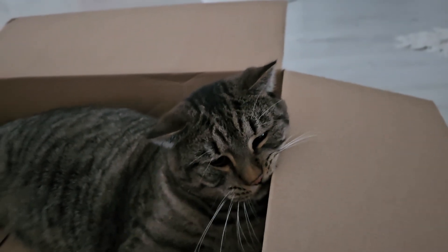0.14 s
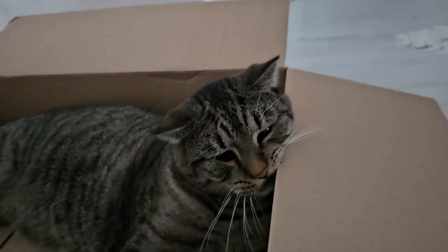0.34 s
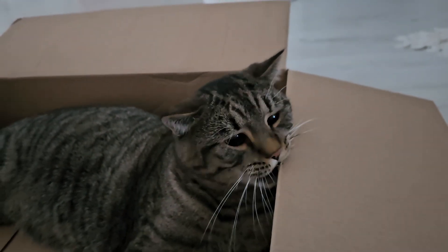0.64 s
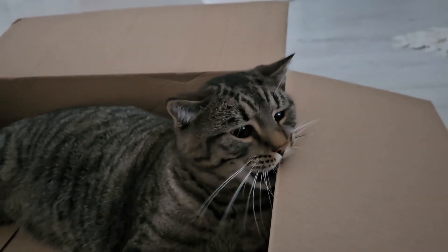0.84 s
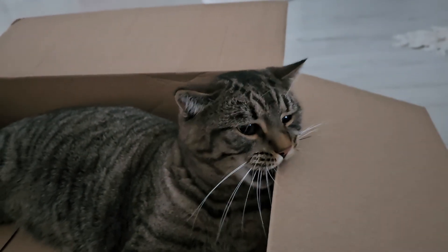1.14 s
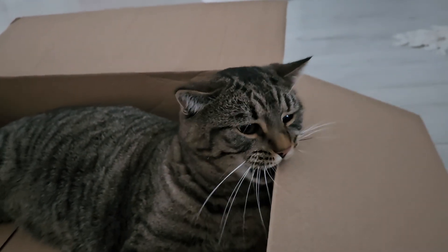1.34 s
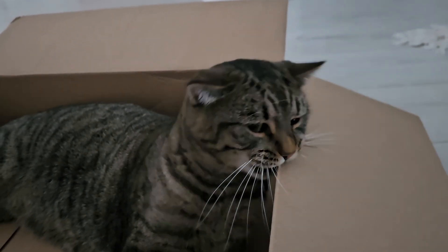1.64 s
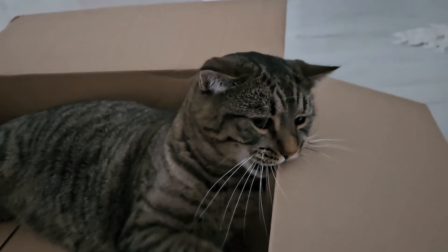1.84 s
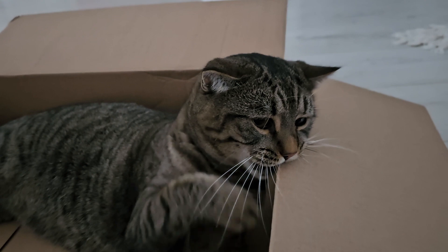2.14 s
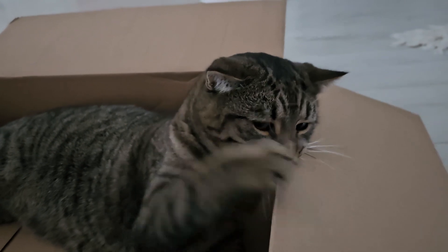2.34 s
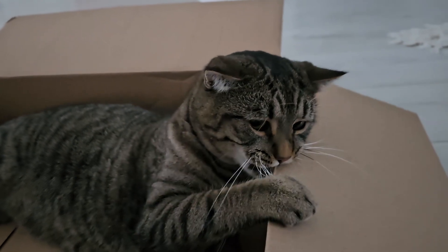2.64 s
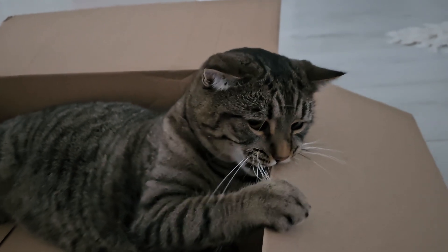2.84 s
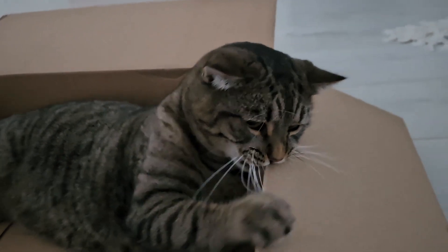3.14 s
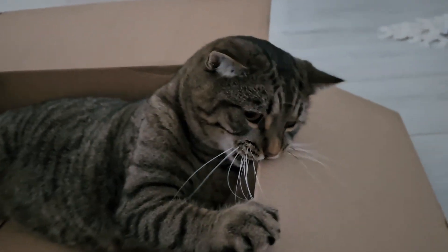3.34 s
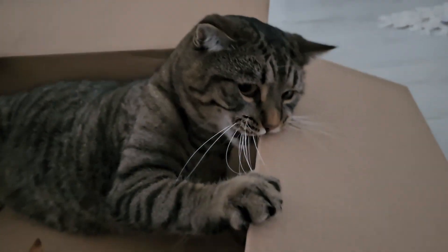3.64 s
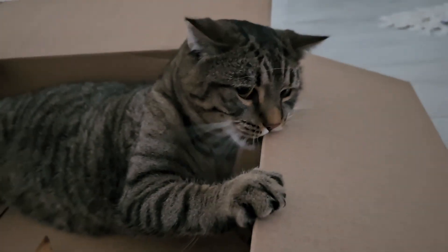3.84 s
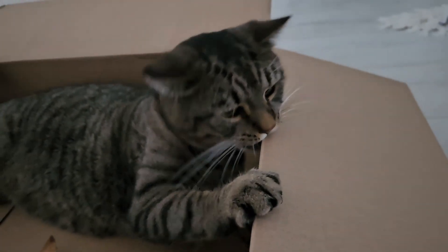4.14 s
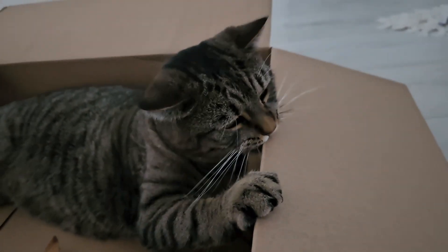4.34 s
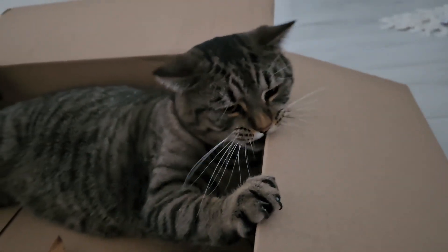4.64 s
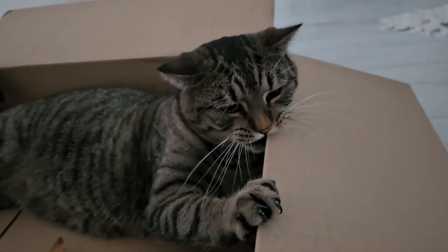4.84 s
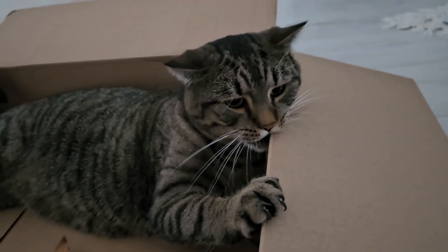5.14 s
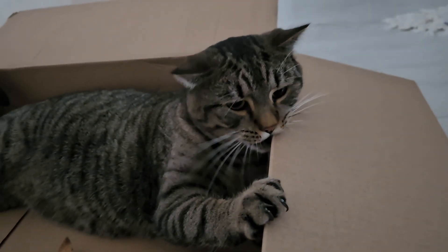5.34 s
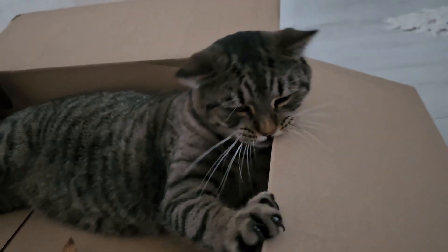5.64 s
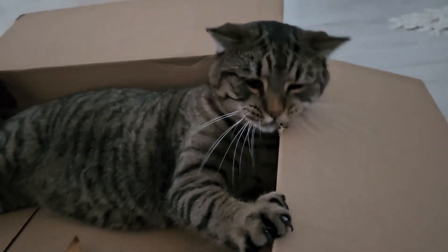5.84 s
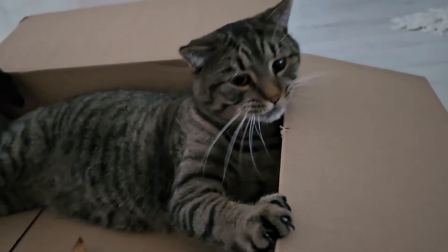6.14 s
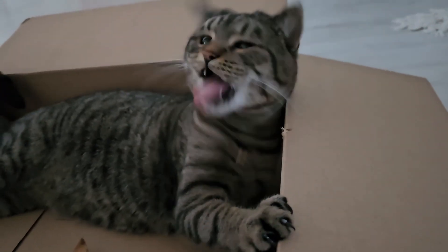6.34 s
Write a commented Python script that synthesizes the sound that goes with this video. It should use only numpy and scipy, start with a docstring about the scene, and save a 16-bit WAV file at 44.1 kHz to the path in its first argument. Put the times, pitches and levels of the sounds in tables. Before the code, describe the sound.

Close up in a quiet indoor room, irregular cardboard scratching: faint crackles first, then crunchy bites with rumbling panels, a scatter of light claw ticks, and harsh claw scrapes. The flap slaps free with a single loud, boxy knock, then smaller scrapes and rubbing continue until a bump and final rasps. Short room reverberation, soft air noise and a faint high electrical whine behind.

```python
"""A cat in a cardboard box claws and gnaws at a flap, close to the microphones in a quiet, faintly whining room.
At first its teeth scrape the cut edge in gritty strokes (stick-slip friction) and fibres snap (brittle fracture).
Light ticks of claw or tooth tips (impact) are scattered throughout, most between 1.9 and 2.9 s; from 2.5 s a paw
claws the open face, and after a faint squeak the flap knocks free at 4 s. Gnawing at the edge then resumes, with a
strong push near 5.8 s. Throughout, the panels thud and rumble (plate resonance) under the cat's shifting weight."""
import sys
import numpy as np
from scipy import signal
from scipy.fft import rfft, irfft, next_fast_len
from scipy.io import wavfile
from scipy.ndimage import uniform_filter1d, map_coordinates

SR = 44100
rng = np.random.default_rng(int(sys.argv[2]) if len(sys.argv) > 2 else 0)


def master(y):
    """Save y as 16-bit WAV."""
    cut = np.clip(np.atleast_2d(y).T, -1, 1)
    pcm = np.round(cut * 32767)  # scale
    wavfile.write(sys.argv[1], SR, pcm.astype(np.int16))


N = 286650

# Every spectrum is a list of rows: frequency in Hz, relative level in dB.
# Every resonance list has rows: centre in Hz, width in Hz, lift in dB.

# Room air noise, a spectrum.
AIR_SPECTRUM = [(12, -55), (20, 5.5), (113, -1.5), (326, -11), (524, -14), (843, -19), (1890, -1),
                (3500, -14), (4890, -10), (6840, -24.5), (9040, -23), (10400, -56), (11300, -25),
                (13400, -27), (15800, -31)]
# Whine of a distant appliance. Each row: centre in Hz, width in Hz, rms level in dB.
WHINE_BANDS = [(1380, 130, -82), (1880, 200, -79), (3060, 65, -84.5), (4812, 40, -80)]
WHISTLE_HZ, WHISTLE_DB = 4816, -82  # the appliance's steady top tone, rms

# Echoes between the flaps. Each row: frequency in Hz, level against the direct sound in dB.
SCATTER_LEVEL = [(60, -10), (150, -14), (500, -14), (2000, -11), (4000, -3), (8000, 1), (14000, 1)]
# Reverberation of the room. Each row: frequency in Hz, time to fall by 60 dB in seconds.
ROOM_DECAY = [(100, 0.39), (500, 0.44), (2000, 0.47), (6000, 0.35), (15000, 0.13)]
# Strength of that reverberation. Each row: frequency in Hz, level in dB.
ROOM_LEVEL = [(100, -18), (500, -14.5), (1000, -13), (2000, -20), (4000, -9.5), (12000, -12.5)]
# Level difference of the microphones. Each row: frequency in Hz, left minus right in dB.
LEFT_MINUS_RIGHT = [(100, 1), (500, 2), (1000, -2.5), (2000, -11), (4000, -8), (8000, -4), (12000, 2.5)]
# Phase difference of the microphones. Each row: frequency in Hz, lead of the left in radians.
LEFT_LEAD = [(0, -1), (1120, -0.5), (1550, -2), (2240, -0.03), (3700, 2), (4820, -4), (8010, -13),
             (8870, -6.5), (9990, -8.5), (10500, -2.5), (12400, -18), (13000, -23.5), (14200, -24.5),
             (15800, -18.4)]
TOP_HZ = 15830  # band limit of the microphones

# How hard the cat leans on the walls. Each row: time in seconds, weight in dB.
WEIGHT = [(0.0, -78.5), (0.5, -75), (1.08, -60.5), (1.65, -61), (1.88, -75), (2.21, -77.5), (3.4, -68.5),
          (3.84, -76), (4.16, -67.5), (4.72, -70), (4.85, -75), (5.07, -71), (5.25, -69), (5.38, -63.5),
          (5.57, -64), (5.83, -58), (6.17, -75), (6.5, -74)]
FULL_WEIGHT_DB = -60  # reference for WEIGHT
RUMBLE_GROWS = 1.19  # dB of wall rumble per dB of weight
# Coat and paws sliding along the board. Each row: time in seconds, relative level in dB.
SLIDE_LEVEL = [(0.0, -72.5), (0.81, -71), (1.27, -72), (1.7, -64.5), (1.96, -86), (2.24, -79.5),
               (3.09, -63), (3.4, -61.5), (3.69, -66.5), (3.96, -64), (4.36, -72), (4.69, -61.5),
               (4.89, -73.5), (5.1, -73), (5.56, -67.5), (5.77, -53.5), (6.19, -74), (6.5, -77)]
# Soft rubbing of the coat, a spectrum.
FUR_SPECTRUM = [(120, -17), (300, -9.5), (480, 3.5), (800, -3), (1400, 2), (2300, 1.5), (3800, -11),
                (5500, -17.5), (15000, -34.5)]
# Bending of the big panels, a spectrum.
FLEX_SPECTRUM = [(20, -13.5), (55, -10.5), (85, -3), (105, -1.5), (127, 5), (160, -2.5), (192, -3.5),
                 (225, -9), (310, -17), (450, -12.5), (900, -40.5), (3000, -57)]
# Free ringing of the panels. Each row: nominal frequency in Hz, nominal level in dB,
# nominal time to fall by 60 dB in seconds.
PANEL_MODES = [(85.2, -4.5, 0.3), (116.4, -3, 0.23), (126.8, 1.5, 0.29), (143.5, -10, 0.33),
               (193, -9, 0.16), (238.5, -12, 0.16), (338, -12.5, .08), (424.4, -9.5, 0.11),
               (537, -17.5, 0.27)]

# A paw or shoulder pushes on a wall. Each row: time in seconds, relative level in dB, length in seconds.
PUSHES = [(.6, -61, 0.12), (.72, -62.5, 0.047), (.863, -46.5, 0.077), (.97, -50, 0.045),
          (1.075, -53.5, 0.046), (1.543, -48, 0.042), (1.69, -47.5, 0.14), (2.37, -61.5, 0.047),
          (2.528, -39.5, 0.046), (3.562, -54.5, 0.12), (3.75, -60, .04), (4.36, -53.5, 0.13),
          (4.679, -51.5, 0.16), (5.176, -55, .05), (5.282, -59, .05), (5.56, -51, 0.053), (5.65, -56, .08),
          (5.795, -37, 0.16), (5.945, -55, 0.071)]
PUSH_RISE = 0.3  # the 20 dB rise of a push, as a share of its length (its 20 dB fall)
BRISK_PUSH_S = 0.06  # a push this long rings the panels at its own level, a slower one less
# Air inside the box, a spectrum.
HOLLOW_SPECTRUM = [(100, -32), (270, -16.5), (380, -3), (480, 1), (640, -6), (900, -13), (1500, -37.5),
                   (4000, -75)]
# Resonances of that air, a resonance list.
CAVITY_MODES = [(428, 49, 5.5), (467, 21, 7), (526.4, 28, 11)]
# Air squeezed by a bulging wall, a resonance list.
PUFF_MODES = [(372, 130, 8)]

# Light claw and tooth contacts. Each row: nominal time in seconds, relative level in dB.
TICKS = [(.385, -53), (.716, -50.5), (1.8945, -42), (2.0028, -40.5), (2.1603, -39.5), (2.2398, -44),
         (2.2576, -39), (2.398, -46), (2.4184, -42.5), (2.766, -38), (2.795, -39), (2.809, -36.5),
         (2.821, -36), (2.8469, -38), (3.0859, -41), (3.967, -46), (4.9698, -42.5), (5.3625, -39),
         (5.415, -49), (6.1406, -45.5), (6.441, -38)]
TICK_HISS_DB = -19.5  # fibre hiss against its tick
# Colour of a claw or tooth tip, a spectrum.
TIP_SPECTRUM = [(200, -31), (600, -10), (1300, -9), (1900, 4.5), (2400, -4.5), (3100, -0.5), (4200, -6.5),
                (6000, -13.5), (15000, -26.5)]
# Colour of the flap's knock, a spectrum.
BLOW_SPECTRUM = [(60, -25), (200, -0.5), (400, 2.5), (750, 0.5), (1400, 5), (1850, 4), (2150, -3),
                 (2600, 1), (3600, -13), (6000, -22), (15000, -58)]

# Fibres giving way under a tooth or claw. Each row: nominal start in seconds, relative level in dB,
# fibre hiss against it in dB.
SNAPS = [(0.0632, -48.5, -16), (0.202, -52, -24), (.283, -46, -6), (.854, -33, -11.5), (.858, -41, -4),
         (1.305, -45, -22), (1.314, -44.5, -3), (1.325, -32.5, -11.5), (1.54, -38.5, -10),
         (1.664, -37, -13), (1.67, -39.5, -8), (1.686, -38, -12), (2.524, -31, -18), (2.532, -34, -12),
         (3.188, -38.5, -24), (3.525, -47.5, -17), (4.355, -47, -1), (4.458, -62, -1), (4.709, -46.5, -8.5),
         (4.726, -39, -9.5), (5.17, -49.5, -24), (5.525, -55.5, -2.5), (5.555, -53.5, -2.5),
         (5.698, -55, -4), (5.921, -43.5, -12)]
# Stiff liner paper cracking, a spectrum.
LINER_SPECTRUM = [(900, -41), (1800, -9), (2800, 1), (3700, -2.5), (4600, -6.5), (6500, -16), (15000, -43)]
THUD_DB, THUD_PER_WEIGHT = -13.5, 1.0  # recoil share under full weight; dB gained per dB of weight

# Rasping strokes. Each row: peak in seconds, relative level in dB, rise by 20 dB in seconds,
# fall by 20 dB in seconds, fibre hiss against it in dB.
STROKES = [(0.063, -50, .002, 0.12, -9), (0.199, -50.5, .002, 0.071, -24), (.585, -59, .11, 0.096, -16.5),
           (.857, -47, 0.041, 0.06, -16), (0.964, -57, .033, .02, -24), (1.205, -40.5, 0.042, 0.028, -12.5),
           (1.276, -51, .027, .015, -15), (1.32, -47.5, 0.031, 0.09, -15), (1.68, -41.5, .018, .06, -18),
           (1.77, -54.5, 0.036, .06, -15), (1.92, -72, 0.066, .09, 2.5), (2.536, -49, 0.027, 0.098, -12),
           (2.943, -51, .044, .032, -22.5), (2.97, -40, .016, .042, -23), (3.189, -47, .0023, 0.045, -18),
           (3.228, -35, 0.051, 0.039, -19), (3.28, -43.5, 0.036, .032, -16),
           (3.304, -27.5, .012, .024, -27), (3.319, -38, 0.045, 0.021, -11),
           (3.39, -51.5, 0.042, 0.047, -11), (3.554, -58, 0.072, 0.035, -8), (3.62, -60.5, 0.074, 0.039, 3),
           (3.748, -49, 0.033, 0.016, -6), (4.36, -55, 0.12, .13, -11), (4.565, -50.5, 0.039, 0.087, -13.5),
           (4.679, -47, 0.055, 0.035, -16.5), (4.74, -52, .036, .11, -12), (4.839, -57.5, .05, .026, -20),
           (5.285, -46, 0.029, 0.019, -15), (5.47, -58.5, 0.04, 0.028, -13), (5.6, -54, 0.027, 0.19, -9.5),
           (5.75, -43, 0.057, 0.048, -8), (5.789, -42, 0.023, .11, -8), (5.933, -40, .02, 0.023, -9),
           (6.19, -60.5, 0.071, 0.042, -11.5), (6.498, -50, .028, .057, -15)]
USUAL_STROKE_DB = -50
BITE_LOSS = 0.38  # a deep bite stays in the flap: dB of share that the box loses per dB of force
FLEX_DB, FLEX_PER_WEIGHT = -2.5, 1.2  # panel share under full weight; dB gained per dB of weight
# Hollow ring of the box under a stroke. Each row: time in seconds, relative level in dB.
HOLLOW_RING = [(0, -21), (1.3, -11), (1.7, -6), (2.5, 2), (3.3, -5), (3.7, -1.5), (4.5, -8.5), (6.5, -8.5)]
# Hissing fibres, a spectrum.
FIBRE_SPECTRUM = [(1500, -10.5), (3500, 6), (5000, -2.5), (6400, -5), (7700, -0.5), (10000, -6),
                  (11700, -1.5), (15500, -11)]
# Rasping board, a spectrum.
BOARD_SPECTRUM = [(120, -31), (300, -15.5), (450, -5), (750, -4), (1400, -3), (2400, -2.5), (3500, -11.5),
                  (5000, -17.5), (7000, -32), (15000, -40)]
# The flap itself, a resonance list.
FLAP_MODES = [(442, 123, 6.5), (939, 60, 9), (1150, 80, 4), (1625, 47, 5.5), (1877, 274, 11.5),
              (2306, 200, 4.5), (3080, 150, 3), (3800, 150, 4)]
# Added by a claw on the open face of the flap, a resonance list.
FACE_MODES = [(1080, 170, 5.5), (1460, 250, -2), (1874, 180, 5), (2266, 130, 7.5)]
# Added by teeth crushing its cut edge, a resonance list.
EDGE_MODES = [(348, 100, 2), (760, 230, 3.5), (1334, 310, 3), (1930, 310, -2.5), (3000, 480, 2.5)]
# The paw's spell on the open face: start in seconds, end in seconds.
PAW_ON_FLAP = (2.45, 3.95)


def amp(db):
    """Decibels are twenty times the logarithm of an amplitude ratio."""
    return 10 ** (np.asarray(db) / 20)


def unit(x):
    """Normalisation to a root-mean-square of 1."""
    return x / np.sqrt(np.mean(x ** 2) + 1e-20)


def noise():
    """White noise: independent random samples, rms 1."""
    return rng.standard_normal(N)


def along(points, hz):
    """Interpolation of (Hz, value) points on a logarithmic frequency axis."""
    point_hz, values = np.transpose(points)
    return np.interp(np.log(hz + 1), np.log(point_hz + 1), values)


def level(curve, s):
    """Linear interpolation of a (seconds, dB) curve at the times s."""
    return np.interp(s, *np.transpose(curve))


def leaning(s):
    """Mechanical coupling: the cat's weight, in dB re full weight, joins flap to box."""
    return level(WEIGHT, s) - FULL_WEIGHT_DB


def filtered(x, response):
    """Linear filtering: a spectrum is multiplied by a response of frequency."""
    size = next_fast_len(N + SR // 2)
    hz = np.fft.rfftfreq(size, 1 / SR)
    return irfft(rfft(x, size) * response(hz), size)[..., :N]


def coloured(x, spectrum, resonances=(), size=16384):
    """Minimum-phase resonance: a causal filter of unit power, a broad spectrum lifted by modes."""
    hz = np.fft.rfftfreq(size, 1 / SR)
    db = along(spectrum, hz)
    for centre, width, lift in resonances:
        db = db + lift / (1 + (2 * (hz - centre) / width) ** 2)
    # Folding the cepstrum onto positive times makes the filter causal.
    cepstrum = irfft(np.log(amp(db)))
    cepstrum[1:size // 2] *= 2
    cepstrum[size // 2 + 1:] = 0
    ring = irfft(np.exp(rfft(cepstrum)))
    return signal.fftconvolve(x, ring / np.linalg.norm(ring))[:N]


def narrow(hz, width):
    """Resonant selection: two channels of noise passed by a single mode, rms 1."""
    return unit(filtered(rng.standard_normal((2, N)), lambda f: 1 / (1 + (2 * (f - hz) / width) ** 2)))


def grit(rate, spread_db):
    """Stick-slip friction: slips at random moments, rate a second, of uneven size, rms 1."""
    slips = rng.random(N) < rate / SR
    signs = np.sign(noise())
    sizes = amp(spread_db * np.clip(noise(), -2, 2))
    return unit(slips * signs * sizes)


def snagging(rate, depth_db):
    """Stick-slip on a slower scale: an uneven gain of rms 1, changing rate times a second."""
    knots = rng.standard_normal(N // 100)
    wander = map_coordinates(knots, [np.arange(N) * rate / SR])
    return unit(amp(depth_db * np.clip(wander, -2, 2)))


def swell(s, rise, fall):
    """Loading and release: force grows exponentially up to s, then decays; rise and fall span 20 dB."""
    force = np.zeros(N)
    near = np.arange(max(int((s - 4 * rise) * SR), 0), min(int((s + 4 * fall) * SR), N))
    t = near / SR - s
    force[near] = amp(-20 * np.maximum(-t / rise, t / fall))
    return force


def impulse(s):
    """Impact: a contact shorter than any period heard."""
    return signal.unit_impulse(N, int(np.clip(s * SR, 0, N - 1)))


def bent(x, travel):
    """Bending-wave dispersion: highs arrive before lows."""
    # travel is the seconds taken at 2 kHz, whose arrival is then set to zero
    return filtered(x, lambda hz: np.exp(-2j * np.pi * travel * (2 * np.sqrt(2000 * hz) - hz)))


def roaming(x, depth_db):
    """Modal excitation: a contact point wandering over the board favours ever different modes."""
    z = signal.stft(x, nperseg=1024)[2]
    field = uniform_filter1d(rng.standard_normal(z.shape), size=5, axis=0)  # smooth over frequency
    field = uniform_filter1d(field, size=7, axis=1)  # smooth over time
    return signal.istft(z * amp(depth_db * unit(field)), nperseg=1024)[1][:N]


def thud(s, ring=1.0, detune=0.039, vary_db=2):
    """Free vibration of plates: decaying modes, whose pitch and loudness vary a little at random each time."""
    t = np.arange(SR // 2) / SR
    chance = rng.standard_normal((len(PANEL_MODES), 2))
    wave = np.zeros(len(t))
    for (hz, db, t60), (louder, sharper) in zip(PANEL_MODES, chance):
        decay = amp(db + vary_db * louder - 60 * t / (t60 * ring))
        wave += decay * np.sin(2 * np.pi * hz * (1 + detune * sharper) * t)
    soft_onset = 1 - np.exp(-t / 0.0058)
    return np.pad(wave * soft_onset, (int(s * SR), N))[:N]


def board(x):
    """Driving-point dependence: slips ring the flap from its face under the paw, else from its edge."""
    t = np.arange(N) / SR
    clawing = (t > PAW_ON_FLAP[0]) & (t < PAW_ON_FLAP[1])
    face = coloured(x * clawing, BOARD_SPECTRUM, FLAP_MODES + FACE_MODES)
    edge = coloured(x * ~clawing, BOARD_SPECTRUM, FLAP_MODES + EDGE_MODES)
    return amp(1.5) * face + edge


def room_tone():
    """Partial coherence: steady air noise partly shared by both microphones, with a thin whine."""
    shared, left, right = [coloured(noise(), AIR_SPECTRUM) for _ in range(3)]
    air = amp(-72.5) * shared + amp(-65.8) * np.array([left, right])
    whistle = amp(WHISTLE_DB) * np.sqrt(2) * np.sin(2 * np.pi * WHISTLE_HZ * np.arange(N) / SR)
    whine = sum(amp(db) * narrow(hz, width) for hz, width, db in WHINE_BANDS)
    return air + whistle + whine


def echoes(x, t60s, delay, count=13):
    """Diffuse reflection: decaying stereo noise tails, whose random pattern changes steadily throughout."""
    out = np.zeros((2, N))
    place = np.linspace(0, count - 1, N)
    for k in range(count):
        hz, t, z = signal.stft(rng.standard_normal((2, SR // 2)), SR, nperseg=128)
        decay = amp(-60 * t / along(t60s, hz)[:, None])
        tail = signal.istft(z * decay, SR, nperseg=128)[1]
        tail = np.pad(tail / np.linalg.norm(tail[0]), ((0, 0), (int(delay * SR), 0)))
        # Neighbouring patterns crossfade at equal power.
        near = np.flatnonzero(abs(place - k) < 1)
        start = near[0]
        faded = x[near] * np.cos(np.pi / 2 * (place[near] - k))
        wet = signal.fftconvolve(faded[None], tail, axes=1)[:, :N - start]
        out[:, start:start + wet.shape[1]] += wet
    return out


def ports(hz):
    """Stereo level and phase cues: gain and phase at the left and right microphones for the flap's sound."""
    sides = np.array([[-1], [1]])
    gain = 2 / (1 + amp(sides * along(LEFT_MINUS_RIGHT, hz)))
    return gain * np.exp(-.5j * sides * along(LEFT_LEAD, hz))


def shifting():
    """Forced plate vibration and friction: walls rumble under weight, a sliding coat rubs and hisses."""
    t = np.arange(N) / SR
    rumble = amp(FULL_WEIGHT_DB + RUMBLE_GROWS * leaning(t))
    slide = amp(level(SLIDE_LEVEL, t))
    return (amp(-1.5) * coloured(rumble * noise(), FLEX_SPECTRUM)
            + amp(0.5) * coloured(slide * grit(rate=1500, spread_db=2.5), FUR_SPECTRUM)
            + amp(-11) * coloured(slide * grit(rate=9000, spread_db=1), FIBRE_SPECTRUM))


def bumps():
    """Plate and cavity resonance: a soft push rings and bends the panels and puffs the air in the box."""
    panels, push = np.zeros((2, N))
    for s, db, length in PUSHES:
        panels += amp(db) * np.sqrt(BRISK_PUSH_S / length) * thud(s, ring=0.93)
        push += amp(db) * swell(s, rise=PUSH_RISE * length, fall=length)
    bending = coloured(push * noise(), FLEX_SPECTRUM)
    puff = coloured(push * noise(), HOLLOW_SPECTRUM, CAVITY_MODES + PUFF_MODES)
    return amp(-1) * panels + bending + amp(-6.5) * puff


def squeak():
    """Friction-driven oscillation: a faint, fuzzy tone as the board slips, dying as it lets go."""
    t = np.arange(N) / SR
    slip_db = np.interp(t, [3.80, 3.835, 3.90, 3.96, 4.0], [-100, -61, -61, -70, -110])
    return amp(slip_db + 0.5) * narrow(hz=1000, width=73)[0]


def ticks():
    """Impact and skid: hard tips catch the edge for an instant, too lightly to move the panels."""
    taps, skid, hiss = np.zeros((3, N))
    for s, db in TICKS:
        taps += amp(db) * impulse(s + 0.001484)
        skid += amp(db) * swell(s + 0.0027, rise=0.0018, fall=0.0094)
        hiss += amp(db + TICK_HISS_DB) * swell(s + 0.00059, rise=0.0018, fall=0.0045)
    contact = amp(12.5) * bent(taps, travel=.0025) + amp(-16) * skid * noise()
    fibres = coloured(hiss * grit(rate=7100, spread_db=4), FIBRE_SPECTRUM)
    return coloured(contact, TIP_SPECTRUM, FLAP_MODES) + fibres


def knock():
    """Release of elastic energy: the flap slides off a tooth, slaps back and shakes the whole box."""
    slide = coloured(swell(3.995, rise=0.0039, fall=0.017) * noise(), FIBRE_SPECTRUM)
    chatter = amp(-25.5) * swell(3.9975, rise=0.0045, fall=0.019) * noise()
    blow = amp(1.5) * bent(impulse(3.9987), travel=0.002498)
    slap = coloured(blow + chatter, BLOW_SPECTRUM, FLAP_MODES)
    boom = coloured(swell(4.002, rise=0.0032, fall=0.069) * noise(), HOLLOW_SPECTRUM, CAVITY_MODES)
    panels = thud(4.001, ring=0.92, detune=0.01, vary_db=2.0)
    return amp(-45.5) * slide + slap + amp(-38.5) * boom + amp(-35.5) * panels


def snaps():
    """Fracture: fibres break within milliseconds, the liner cracks and the panel recoils."""
    rasp, hiss, panels = np.zeros((3, N))
    for s, db, hiss_db in SNAPS:
        rasp += amp(db) * swell(s + 0.0014, rise=0.0041, fall=0.011)
        hiss += amp(db + hiss_db) * swell(s + .001, rise=.0015, fall=.006)
        panels += amp(db + THUD_DB + THUD_PER_WEIGHT * leaning(s)) * thud(s + 0.0032)
    liner = coloured(hiss * grit(rate=8000, spread_db=1.0), LINER_SPECTRUM)
    fibres = coloured(hiss * grit(rate=7000, spread_db=5.5), FIBRE_SPECTRUM)
    return board(rasp * grit(rate=7000, spread_db=3.5)) + amp(5.5) * fibres + panels + amp(3.5) * liner


def scrapes():
    """Stick-slip friction: grit rings the flap, fibres hiss, box air rings and leaned-on panels join in."""
    rasp, hiss, hollow, flex = np.zeros((4, N))
    for s, db, rise, fall, hiss_db in STROKES:
        force = amp(db) * swell(s, rise, fall)
        passed_on = force * amp(-BITE_LOSS * (db - USUAL_STROKE_DB))
        rasp += force
        hiss += force * amp(hiss_db)
        hollow += passed_on * amp(level(HOLLOW_RING, s))
        flex += passed_on * amp(FLEX_DB + FLEX_PER_WEIGHT * leaning(s))
    jerks = snagging(rate=280, depth_db=3)
    return (amp(1) * board(rasp * jerks * grit(rate=1800, spread_db=4))
            + amp(2.5) * coloured(hiss * jerks * grit(rate=2900, spread_db=3.5), FIBRE_SPECTRUM)
            + coloured(hollow * grit(rate=1500, spread_db=6), HOLLOW_SPECTRUM, CAVITY_MODES)
            + coloured(flex * grit(rate=1500, spread_db=5), FLEX_SPECTRUM))


def scene():
    """Superposition: the flap, to the right, is heard with the box's scattering and the room's answer."""
    friction = roaming(scrapes() + shifting(), depth_db=2.5)
    box = friction + snaps() + bumps() + ticks() + knock() + squeak()
    box_decay = [(100, 0.02), (10000, 0.023)]  # Hz, seconds to fall by 60 dB
    walls = filtered(echoes(box, box_decay, delay=.0002), lambda hz: amp(along(SCATTER_LEVEL, hz)))
    # Scattering adds no energy, so the sum is scaled back.
    scattered = filtered(box + walls, lambda hz: 1 / np.hypot(1, amp(along(SCATTER_LEVEL, hz))))
    room = filtered(echoes(box, ROOM_DECAY, delay=.008), lambda hz: amp(along(ROOM_LEVEL, hz)))
    return filtered(scattered, ports) + room + room_tone()


def record(dry):
    """Band limitation: the microphones keep nothing above their top frequency."""
    return filtered(dry, lambda hz: hz < TOP_HZ)


dry = scene()
out = record(dry)
master(out)
```